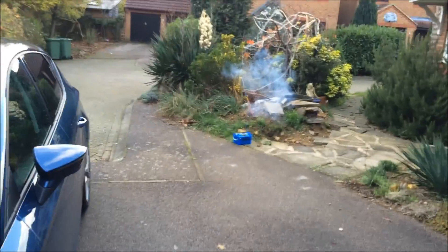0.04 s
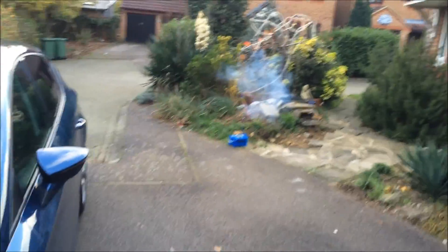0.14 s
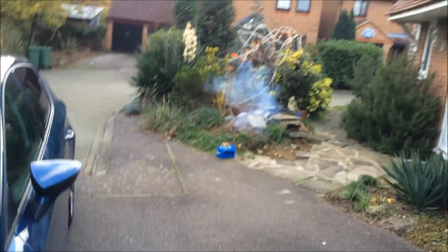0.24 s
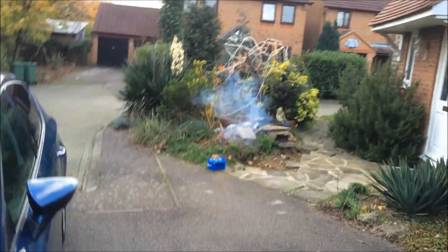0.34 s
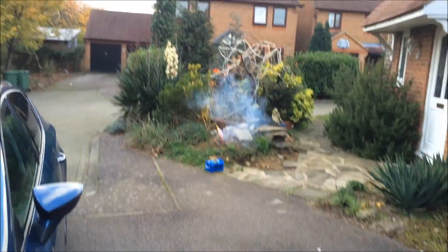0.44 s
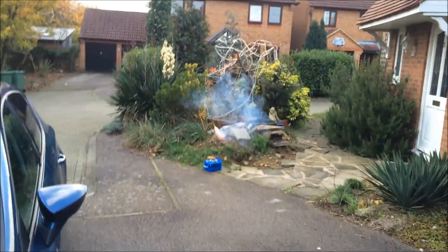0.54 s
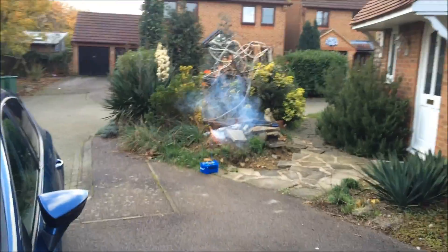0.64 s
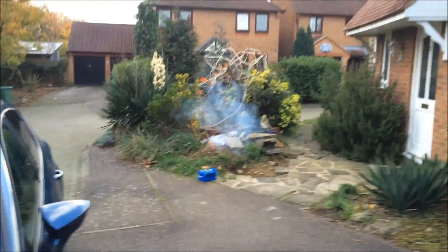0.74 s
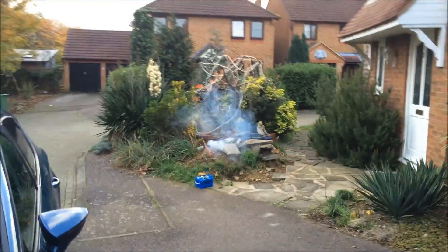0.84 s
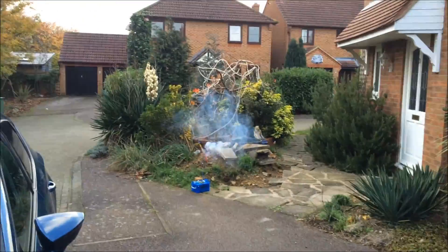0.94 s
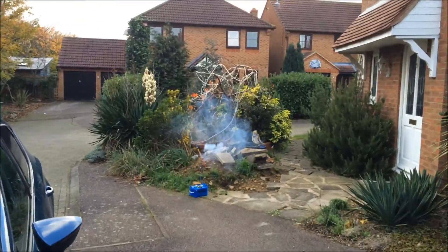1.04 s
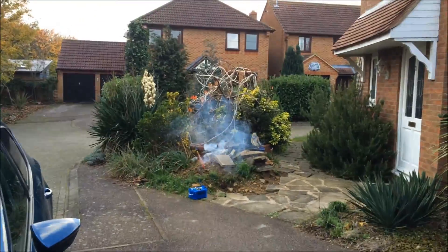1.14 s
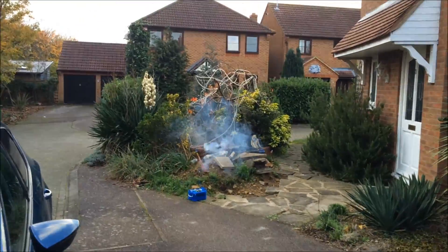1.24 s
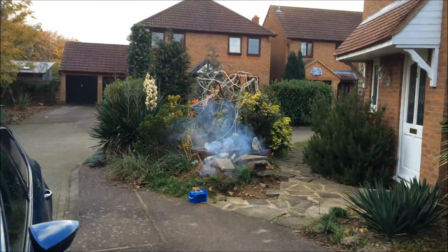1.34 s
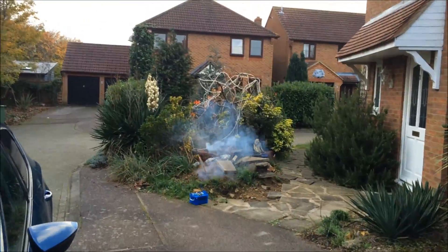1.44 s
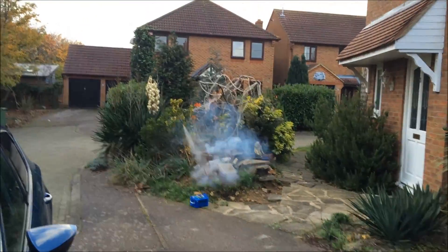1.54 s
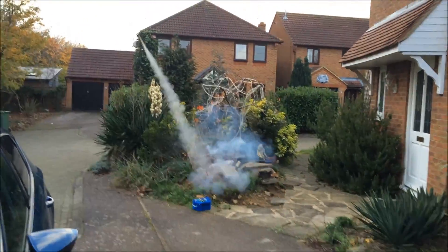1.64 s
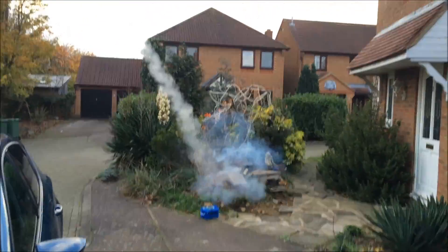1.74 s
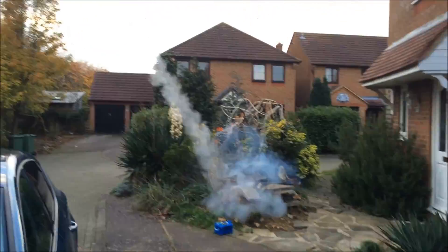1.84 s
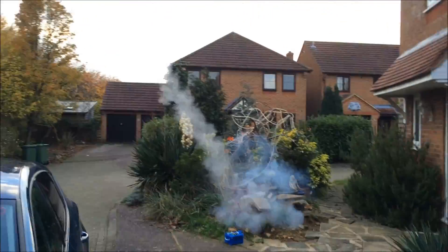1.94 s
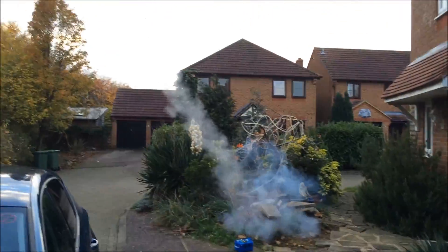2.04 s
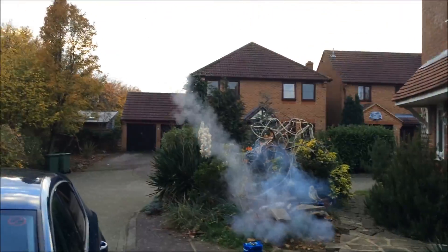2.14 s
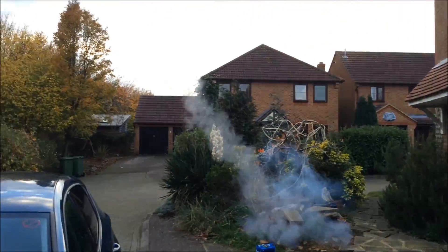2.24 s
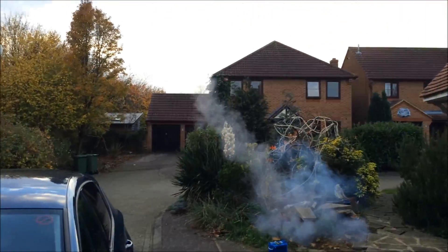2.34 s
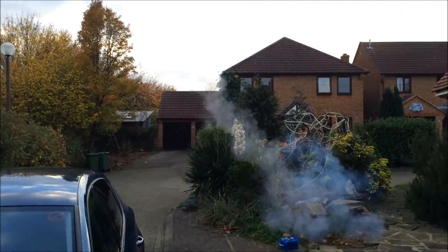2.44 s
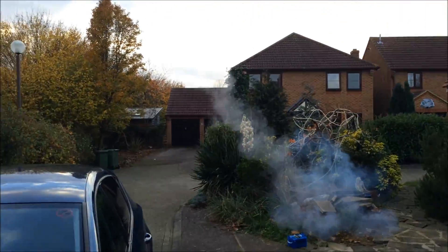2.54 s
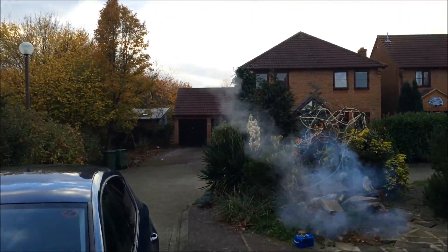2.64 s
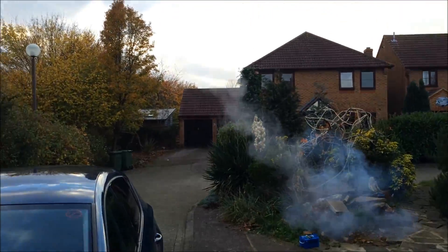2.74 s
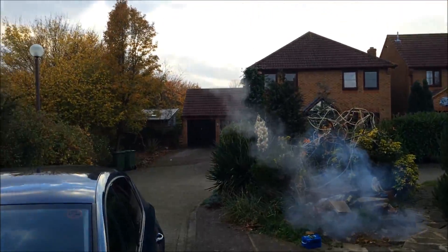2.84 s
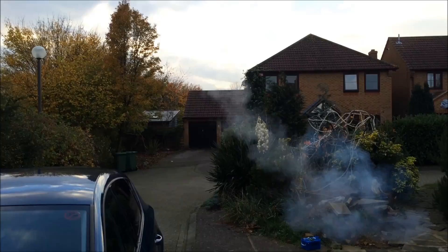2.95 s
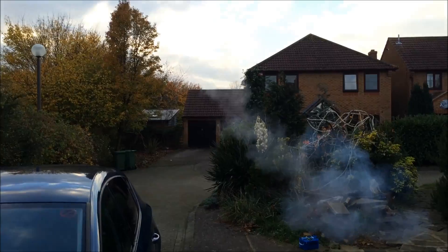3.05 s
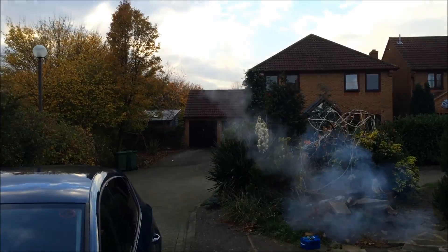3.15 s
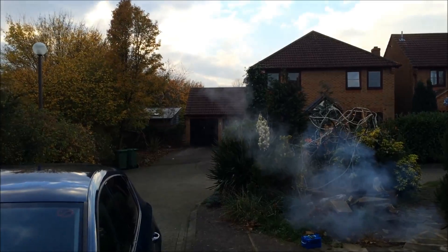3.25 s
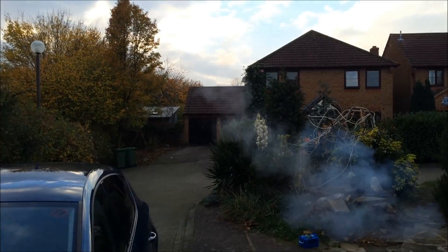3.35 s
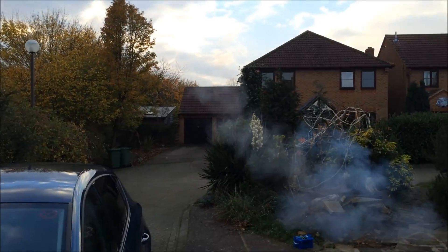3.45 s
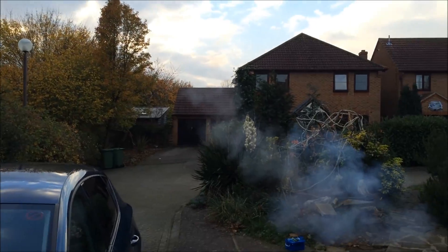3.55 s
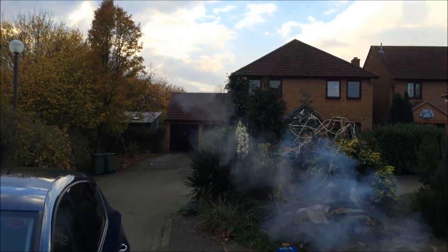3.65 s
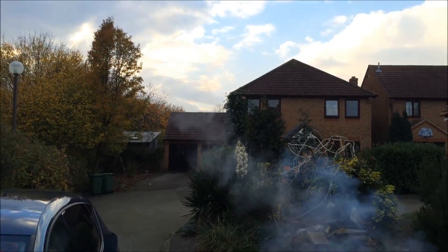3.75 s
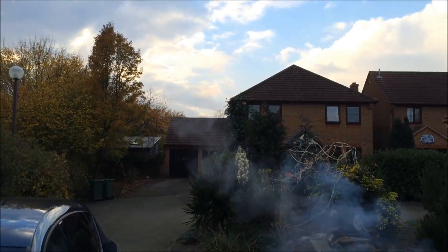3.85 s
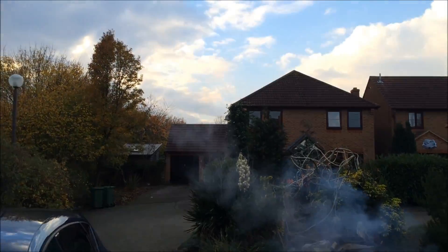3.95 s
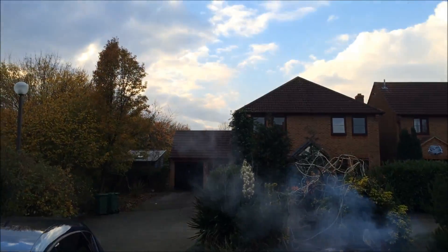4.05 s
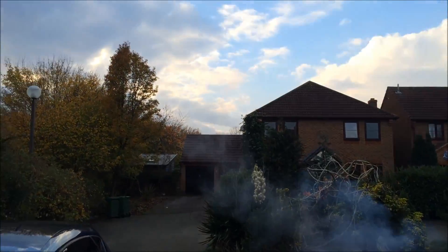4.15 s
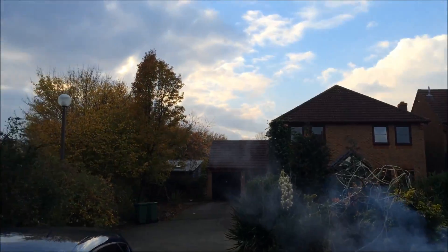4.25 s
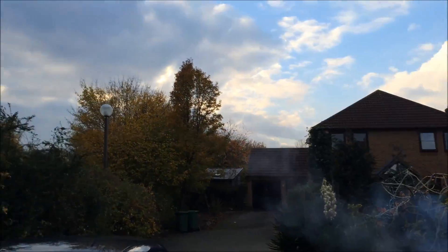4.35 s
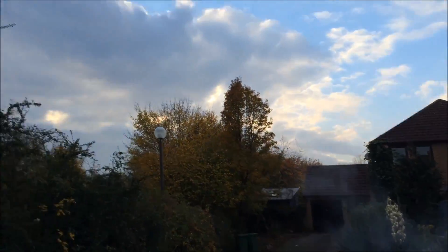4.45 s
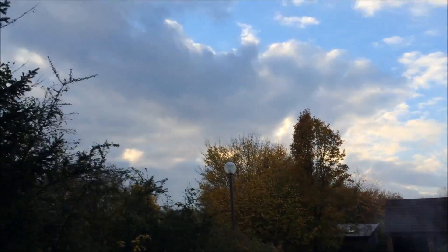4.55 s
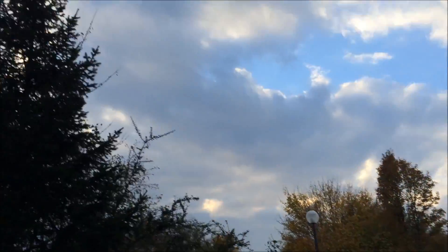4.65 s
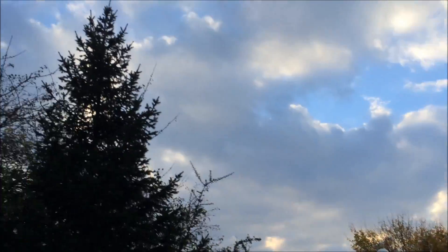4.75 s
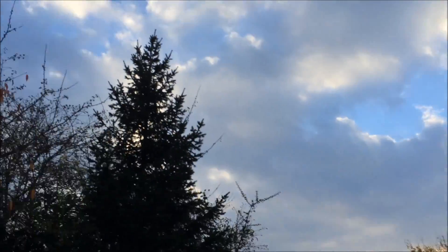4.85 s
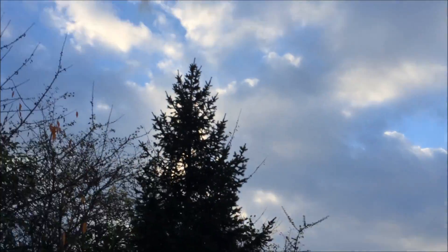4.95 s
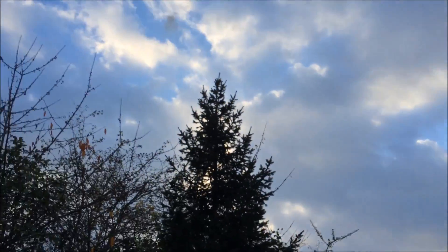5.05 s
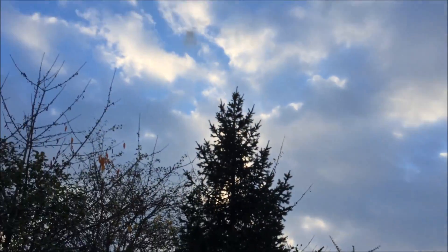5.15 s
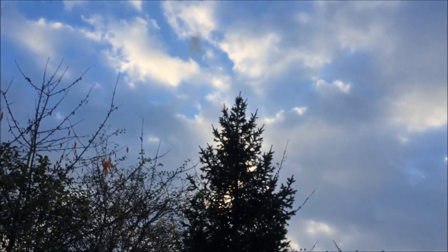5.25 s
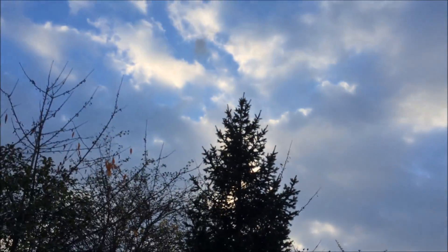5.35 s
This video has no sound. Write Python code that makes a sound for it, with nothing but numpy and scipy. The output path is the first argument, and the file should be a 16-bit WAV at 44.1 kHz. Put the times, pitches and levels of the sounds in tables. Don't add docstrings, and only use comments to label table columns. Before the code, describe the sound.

Mono handheld pickup a few steps from a garden rocket. Quiet fizzing and gritty shoe scrapes come first, over distant engine drone. The motor catches with a bright, tearing whoosh and low thumps of gas on the ground, gone in under half a second. The climbing hiss recedes, then a hard explosive crack with rapid house-front echoes decays into faint traffic rumble.

```python
import sys
import numpy as np
from scipy import signal
from scipy.fft import rfft, irfft
from scipy.io import wavfile
from scipy.ndimage import map_coordinates

SR = 44100
rng = np.random.default_rng(int(sys.argv[2]) if len(sys.argv) > 2 else 0)


def wav_record(signal):
    frames = np.transpose(np.atleast_2d(signal))
    bounded = np.clip(frames, -1, 1)
    quanta = np.round(bounded * 32767).astype(np.int16)
    wavfile.write(sys.argv[1], SR, quanta)


def gain_from_decibels(decibels):
    exponent = np.asarray(decibels, float) / 20
    return 10 ** exponent


N = 238263

# time in seconds, level in dB.
TOWN_LEVEL = [(0.0, -45.5), (0.25, -47.5), (1.28, -47), (1.7, -50), (1.94, -63), (2.03, -62.5),
              (2.29, -53.5), (2.47, -49), (3.46, -51), (3.78, -50), (3.88, -57), (4.08, -48.5),
              (4.63, -52.5), (4.99, -51), (5.4, -52)]
# start in seconds, length in seconds, pitch in Hz,
# glide in Hz per second, level in dB.
DRONES = [
    (0.0, 0.23, 119, -5, -41),
    (.45, 0.24, 117.5, 0, -43.5),
    (1.378, 0.32, 111.2, -3, -44),
    (2.708, .07, 78, -60, -47),
    (3.48, 0.43, 82.4, 8, -48),
    (4.419, 0.15, 91.5, 30.5, -49),
    (4.63, 0.25, 104.7, -0.5, -51.5),
    (5.004, .3, 99.4, -41, -53),
    (4.47, 0.37, 189.8, 18, -49),
    (4.88, .1, 195, -3, -48),
]
# start in seconds, peak in dB, centre in Hz, t60 in seconds.
SCUFFS = [(0.043, -39, 1140, 0.11), (.048, -43, 1870, .08), (.05, -43, 283, 0.21), (.3, -46.5, 328, 0.17),
          (.31, -48.5, 1110, 0.21), (.6, -47, 1500, 0.44), (.72, -45, 1680, .1), (0.873, -39, 1700, 0.27),
          (.876, -34.5, 900, 0.086), (.92, -44, 1590, 0.11), (5.165, -51.5, 1960, 0.17)]
# time in seconds, level in dB.
FUSE_BURN = [(0.0, -53), (0.72, -56), (0.85, -56.5), (.89, -54.5), (1.15, -58.5), (1.29, -46.5),
             (1.41, -42), (1.51, -31.5), (1.59, -24)]
# time in seconds, jet level in dB, share of gas splashing on the ground in dB.
THRUST = [(1.586, -24.5, 3.5), (1.605, -14, -7.5), (1.69, -13.5, -6), (1.72, -12, -2), (1.84, -11.5, 9),
          (1.875, -11.5, -4), (1.904, -10, -2), (1.95, -25, 0), (2.0, -38, -4.5), (2.041, -44, 4)]
# time in seconds, level in dB.
CLIMB = [(1.98, -33), (2.0, -42), (2.09, -45), (2.19, -46), (2.254, -39), (2.35, -40), (2.5, -43.5),
         (2.92, -48), (3.785, -50.5)]
# start in seconds, peak in dB, t60 in seconds, centre in Hz.
PUFFS = [(1.63, -14.5, 0.054, 99.7), (1.632, -18, 0.14, 450), (1.75, -19, 0.31, 100),
         (1.762, -16.5, 0.23, 600), (1.772, -17.5, 0.13, 250), (1.8, -14.5, 0.14, 79.9),
         (1.813, -19, 0.1, 420), (1.833, -14.5, 0.1, 85), (1.836, -14.5, 0.19, 430),
         (1.853, -19.5, .1, 151.2)]
# start in seconds, peak in dB, t60 in seconds, centre in Hz.
LEAD_NOISE = [
    (3.783, -27.5, 0.056, 500),
    (3.786, -40, 0.036, 3500),
]
# time in seconds, peak in dB, sharpness of the front,
# length in milliseconds, rebound from 0 to 1.
BLAST = [(3.79511, 1.5, .75, .48, .15), (3.79874, -1.5, .55, .46, .55), (3.79897, -11, 1.6, .25, .1),
         (3.8031, -12, .2, .8, .2), (3.8068, -14, .5, .4, .3), (3.8111, -5, .4, .4, .2),
         (3.8121, -11, .2, .4, .4), (3.8160, -11, .2, .5, .3), (3.8175, -7, .6, .35, .7),
         (3.8186, -8, .3, .4, .5), (3.8205, -9, .6, .45, .3), (3.8280, -11, .2, .5, .3)]
# arrival in seconds, near level in dB, near t60 in seconds,
# far level in dB, far t60 in seconds.
RETURN = [(3.809, -16.5, .14, -50.5, 5.1), (3.807, -26, 0.085, -30, 2.42), (3.818, -27, 0.26, -37.5, 1.51),
          (3.818, -25.5, 0.25, -37, 0.97), (3.818, -30.5, 0.17, -37.5, 0.56)]
# arrival in seconds, peak in dB, bass in dB, centre in Hz.
ANSWERS = [(3.814, -8.5, -14, 936), (3.835, -22, -6, 1000), (3.89, -17, -16.5, 950),
           (3.915, -27, -29, 1200), (3.955, -17.5, -25, 1470), (3.975, -33, -31, 1460),
           (3.992, -23, -27, 1250), (4.051, -30, -25, 1600), (4.108, -19.5, -12, 1360),
           (4.126, -28.5, -6, 1580), (4.204, -25.5, -21, 1465), (4.24, -35, -20, 1590),
           (4.278, -24, -12, 986), (4.324, -31, -15, 1360), (4.357, -33, -25, 1405), (4.438, -30, -10, 900),
           (4.505, -33, -8, 1096)]

# frequency in Hz, level in dB per Hz.
TOWN_COLOUR = [(15, -53), (25, -12), (103, -3), (135, -6.5), (243, -12.5), (383, -19), (950, -19),
               (2000, -28), (3100, -39.5), (7000, -46.5), (9000, -50.5), (15000, -54.5), (16000, -56)]
FUSE_COLOUR = [(200, -30), (350, -8.5), (700, -20), (1100, -6.5), (1750, 2.5), (2500, -0.5), (3800, -6),
               (4750, -7), (5500, -11), (6250, -5.5), (7200, -11), (12700, -8.5), (15000, -9), (16000, -12)]
THRUST_COLOUR = [(24, -37), (40, -19.5), (82, -11), (160, -3), (290, -12), (430, -2), (765, -11.5),
                 (2110, -7), (4910, -5.5), (6460, -2), (9000, -6), (15000, -2.5), (16000, -5)]
CLIMB_COLOUR = [(350, -2), (600, 5.5), (650, -3.5), (754, 4.5), (1060, 7.5), (1150, 6), (1280, 8.5),
                (2040, 5.5), (2710, -4.5), (6340, -2.5), (10500, -1), (15000, -6), (16000, -5)]
TAIL_COLOUR = [(35, -41.5), (60, -38), (87, 5.5), (112, -2), (162, 11), (381, -3), (1360, 1.5), (2650, -10),
               (6380, -21.5), (11900, -37.5), (15000, -43), (16000, -43)]

# the edges in Hz, low to high.
EDGES = [
    [450, 3800, 5500, 7500, 18000],
    [40, 900, 3000, 7600, 11500, 18000],
    [500, 2400, 4200, 7500, 18000],
    [60, 500, 2500, 4600, 7500, 18000],
    [25, 260, 2500, 18000],
]
FUSE_EDGES, THRUST_EDGES, CLIMB_EDGES, RETURN_EDGES, TOWN_EDGES = EDGES
# offset in dB, share of the level's swing, gain once facing the road in dB.
TOWN_BANDS = [(-0.1, 1.5, 3.3), (-7.5, 0.37, 5), (-21.5, .5, 6.5)]
# offset in dB, share of the burn's swing, extra share once the jet forms.
FUSE_BANDS = [(-1, 0.98, -0.14), (0.5, 1.06, -.03), (2, 1.005, 0.074), (-3.5, 0.94, .5)]
# offset in dB, share of the splash, share of the jet's swing.
THRUST_BANDS = [(-17.5, 1.08, 1.1), (-5.5, 0.18, 0.9), (-1.3, -.05, .98), (-0.6, -0.14, 1.15),
                (1.2, -.15, 1.3)]
# offset in dB, share of the level's swing, change in dB per second.
CLIMB_BANDS = [(-4.5, 1.15, -.5), (-2.5, 0.99, -1.6), (-0.1, 0.83, -0.6), (-4, 1.1, -.3)]

TOWN_MID_DB, FUSE_MID_DB, THRUST_FULL_DB, CLIMB_MID_DB = -49.5, -46, -12.5, -41
LIFT_S, BANG_S = 1.9, 3.797


def ramp(start_s, length_s):
    return np.clip((np.arange(N) / SR - start_s) / length_s, 0, 1)


def rms_one(x):
    return x / np.sqrt(np.mean(x ** 2) + 1e-20)


def in_time(rows, fade_s=0.02):
    s, *columns = np.transpose(rows)
    t = np.arange(N) / SR
    window = np.clip(np.minimum(t - s[0], s[-1] - t) / fade_s + 1, 0, 1)
    return window, [np.interp(t, s, c) for c in columns]


def coloured(x, colour):
    hz, level_db = np.transpose(colour[:-1])
    grid = np.arange(N // 2 + 1) * SR / N + 1
    return irfft(rfft(x) * gain_from_decibels(np.interp(np.log(grid), np.log(hz), level_db)), N)


def band(x, lo_hz, hi_hz, order=3):
    return signal.sosfilt(signal.butter(order, [lo_hz, hi_hz], "band", fs=SR, output="sos"), x)


def drift(rate_hz):
    r = np.exp(-2 * np.pi * rate_hz / SR)
    wander = signal.lfilter([1], [1, -2 * r, r * r], rng.standard_normal(N + SR))
    return rms_one(wander[SR:])


def played(x, levels_db, edges_hz):
    bands = zip(levels_db, edges_hz, edges_hz[1:])
    return sum(gain_from_decibels(db) * rms_one(band(x, lo, hi)) for db, lo, hi in bands)


def burning(sputter_db, rate_hz):
    return rng.standard_normal(N) * gain_from_decibels(sputter_db * drift(rate_hz))


def bounced(x, delay_ms, share):
    return x + share * map_coordinates(x, [np.arange(N) - delay_ms * SR / 1000], order=3)


def bursts(rows, noise, spread, rise_s):
    out = np.zeros(N)
    for s, db, t60, hz in rows:
        start = round(s * SR)
        t = np.arange(min(N - start, SR // 2)) / SR
        at = slice(start, start + len(t))
        shape = gain_from_decibels(db - 60 * t / max(t60, 0.01)) * np.minimum(t / rise_s, 1)
        out[at] += shape * rms_one(band(noise[at], hz / spread, hz * spread, order=2))
    return out


def town():
    t = np.arange(N) / SR
    _, (level,) = in_time(TOWN_LEVEL)
    turned = ramp(4.1, 0.53)
    levels_db = [TOWN_MID_DB + db + share * (level - TOWN_MID_DB) + turn_db * turned
                 for db, share, turn_db in TOWN_BANDS]
    out = played(coloured(burning(sputter_db=1.5, rate_hz=7.2), TOWN_COLOUR), levels_db, TOWN_EDGES)
    swell_s = 0.041
    for s, length, hz, glide, db in DRONES:
        swell = ramp(s - swell_s / 2, swell_s) - ramp(s + length - swell_s, swell_s)
        cycles = (hz + glide * (t - s) / 2) * (t - s)
        out += swell * gain_from_decibels(db) * np.sin(2 * np.pi * cycles)
    return out


def feet():
    grit = burning(sputter_db=2.0, rate_hz=160)
    rows = [(s, db, t60, hz) for s, db, hz, t60 in SCUFFS]
    return bursts(rows, grit, spread=1.32, rise_s=0.0074)


def scattered_return():
    air = coloured(burning(sputter_db=0.5, rate_hz=50), TAIL_COLOUR)
    t = np.arange(N) / SR
    levels_db = []
    for s, near_db, near_t60, far_db, far_t60 in RETURN:
        onset = (t > BANG_S) * (0.082 + ramp(BANG_S, s - BANG_S) ** 3)
        near = onset * gain_from_decibels(near_db - 60 * np.maximum(t - s, 0) / near_t60)
        far_power = ramp(s, 0.22 * far_t60) * gain_from_decibels(far_db - 60 * (t - s) / far_t60) ** 2
        levels_db.append(10 * np.log10(near ** 2 + far_power + 1e-20))
    return played(air, levels_db, RETURN_EDGES)


def echoes():
    rough = burning(sputter_db=1.2, rate_hz=200)
    t60 = 0.21
    slap_rows = [(s, db - 11.5, t60, hz) for s, db, bass_db, hz in ANSWERS]
    thud_rows = [(s, db - 6.5 + bass_db, t60, 150) for s, db, bass_db, hz in ANSWERS]
    slaps = bursts(slap_rows, rough, spread=1.42, rise_s=0.004)
    thuds = bursts(thud_rows, rough, spread=1.9, rise_s=0.0066)
    lead_noise = bursts(LEAD_NOISE, rough, spread=3, rise_s=0.0019)
    return scattered_return() + slaps + thuds + lead_noise


def fuse():
    hiss = coloured(burning(sputter_db=1.0, rate_hz=30), FUSE_COLOUR)
    treble = band(hiss, 6500, 18000, order=1)
    hiss = bounced(hiss - treble, delay_ms=0.64, share=0.2) + bounced(treble, delay_ms=0.64, share=0.6)
    lit, (burn,) = in_time(FUSE_BURN)
    swing = burn - FUSE_MID_DB
    levels_db = [FUSE_MID_DB + db + share * swing + extra * np.maximum(swing, 0)
                 for db, share, extra in FUSE_BANDS]
    creep_s = 0.71
    nozzle_db = -11.5 * (1 - ramp(0, creep_s)) + 1.5 * (1 - ramp(creep_s, 0.16))
    levels_db[2] = levels_db[2] + nozzle_db
    return lit * played(hiss, levels_db, FUSE_EDGES)


def thrust():
    roar = coloured(burning(sputter_db=1.0, rate_hz=84), THRUST_COLOUR)
    firing, (jet, splash) = in_time(THRUST)
    levels_db = [THRUST_FULL_DB + db + share * splash + swing * (jet - THRUST_FULL_DB)
                 for db, share, swing in THRUST_BANDS]
    levels_db[-1] = levels_db[-1] - 16 * (np.arange(N) / SR - THRUST[1][0])
    return firing * played(roar, levels_db, THRUST_EDGES)


def climb():
    jet = coloured(burning(sputter_db=0.7, rate_hz=40), CLIMB_COLOUR)
    flown_s = np.arange(N) / SR - LIFT_S
    roof_ms = 0.105 + (0.301 - 0.105) * ramp(LIFT_S, 1.45)
    paving_ms = 0.94 + (3.85 - 0.94) * ramp(LIFT_S, 0.3)
    jet = bounced(jet, roof_ms, share=0.15)
    jet = bounced(jet, paving_ms, share=0.43 * ramp(LIFT_S, 1))
    aloft, (far,) = in_time(CLIMB)
    levels_db = [CLIMB_MID_DB + db + share * (far - CLIMB_MID_DB) + loss_db * flown_s
                 for db, share, loss_db in CLIMB_BANDS]
    return aloft * played(jet, levels_db, CLIMB_EDGES)


def rocket():
    puffs = bursts(PUFFS, rng.standard_normal(N), spread=1.8, rise_s=0.003)
    return fuse() + thrust() + puffs + climb()


def bang():
    out = np.zeros(N)
    t_ms = np.arange(-100, 200) / SR * 1000
    for s, db, sharp, ms, back in BLAST:
        front = sharp * np.exp(-np.abs(t_ms / 0.045) ** 1.3) + 0.17 * np.exp(-np.abs(t_ms) / 0.45)
        suction = np.exp(-((t_ms - ms) / (0.48 * ms)) ** 2)
        rebound = back * np.exp(-((t_ms - 2.25 * ms) / (0.7 * ms)) ** 2)
        centre = round(s * SR)
        out[centre - 100:centre + 200] += gain_from_decibels(db) * (front - suction + rebound)
    return out


def scene():
    return np.tile(town() + feet() + echoes() + rocket() + bang(), (2, 1))


def roll_off(x):
    return signal.sosfilt(signal.butter(12, 15440, fs=SR, output="sos"), x)


def record(dry):
    dry = signal.sosfilt(signal.ellip(10, 0.3, 50, 15250, fs=SR, output="sos"), dry)
    dry = signal.sosfilt(signal.butter(2, 38, "high", fs=SR, output="sos"), dry)
    overloaded = 1.2 * np.tanh(dry / 1.15) * 0.97
    return roll_off(np.clip(overloaded, -1, 1))


dry = scene()
out = record(dry)
wav_record(out)
```